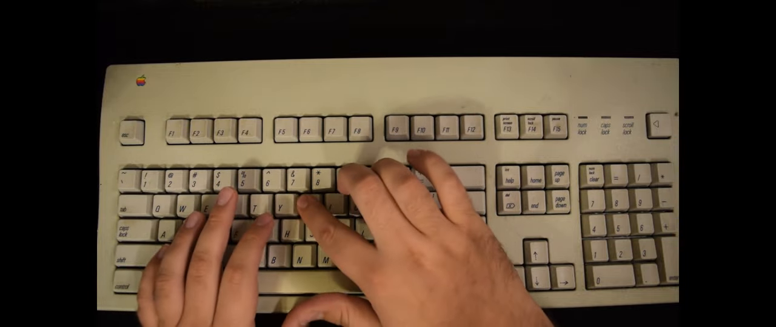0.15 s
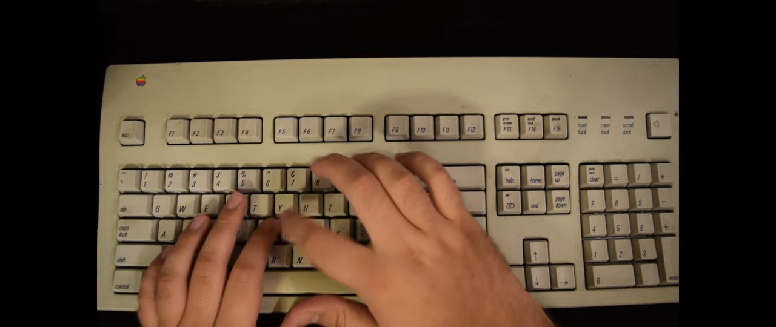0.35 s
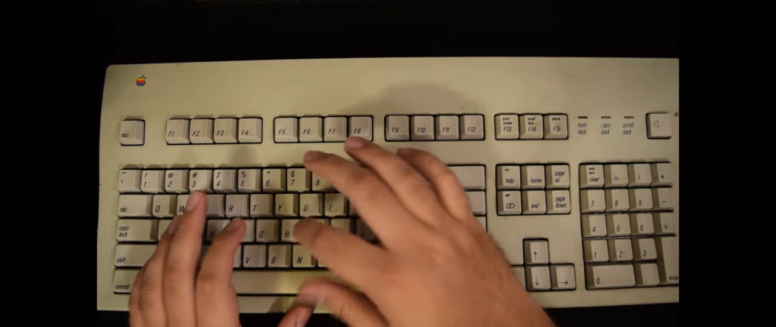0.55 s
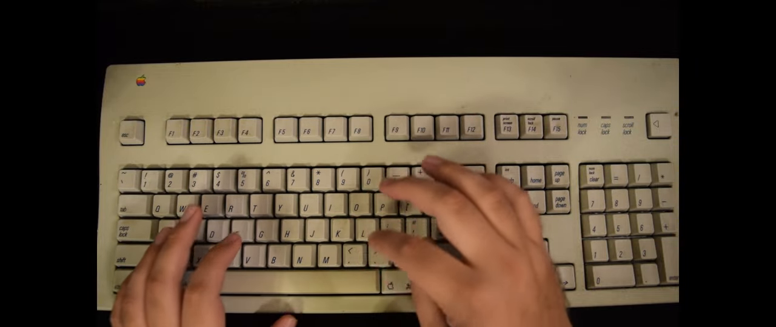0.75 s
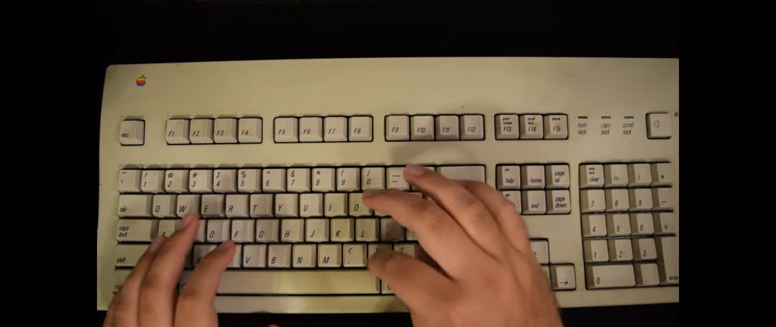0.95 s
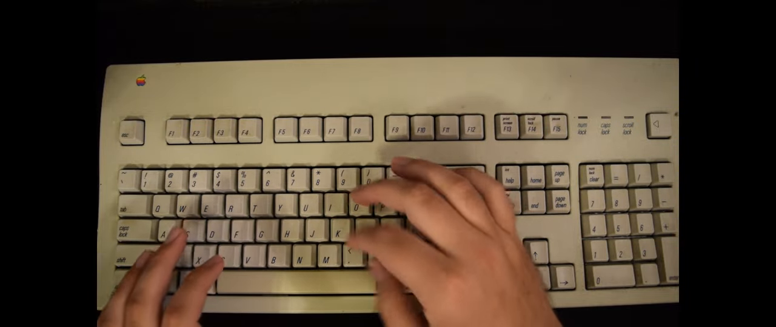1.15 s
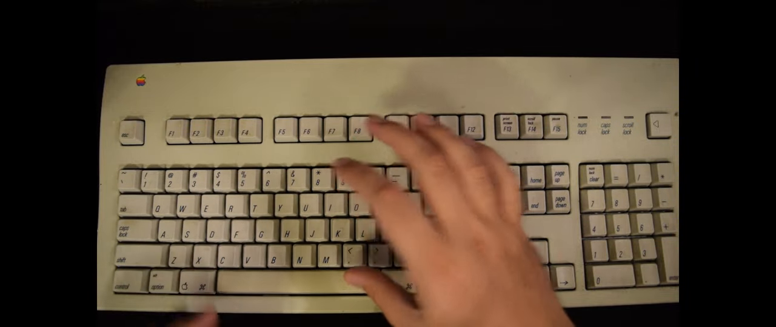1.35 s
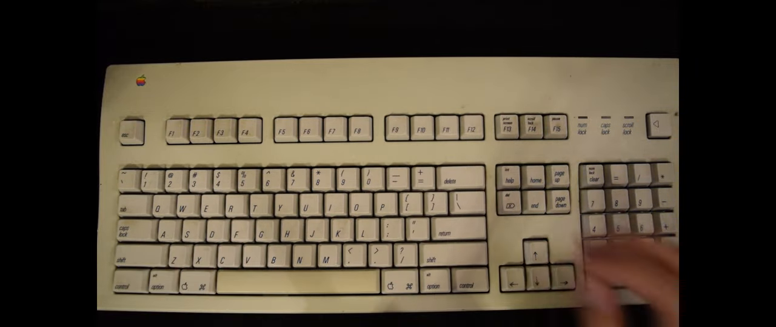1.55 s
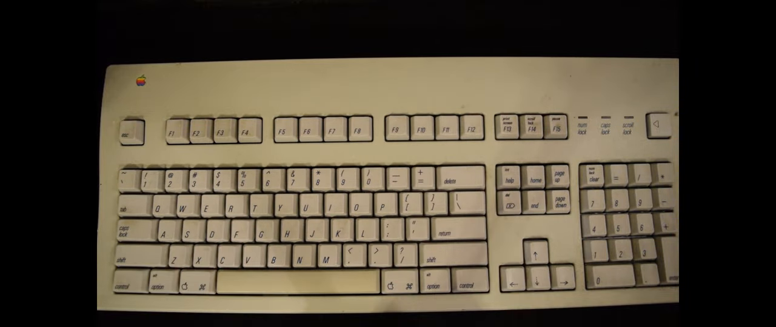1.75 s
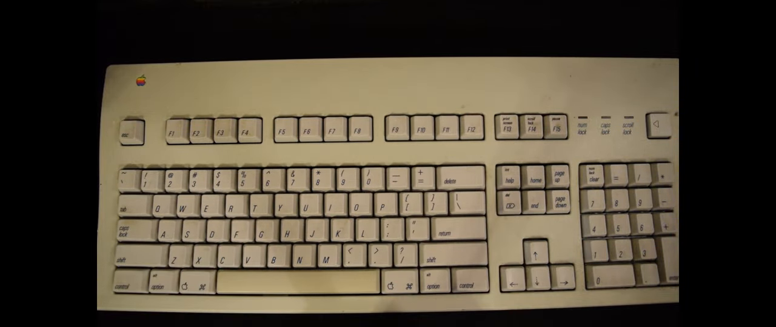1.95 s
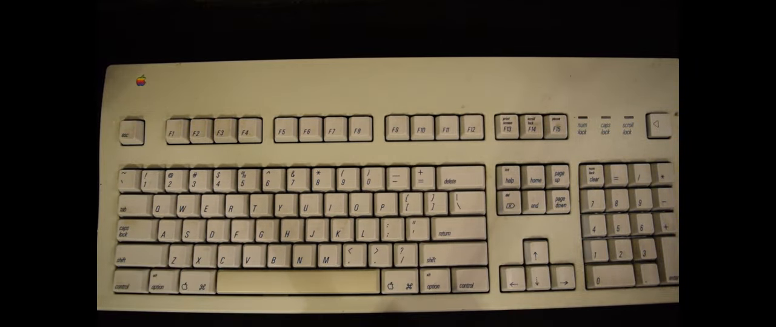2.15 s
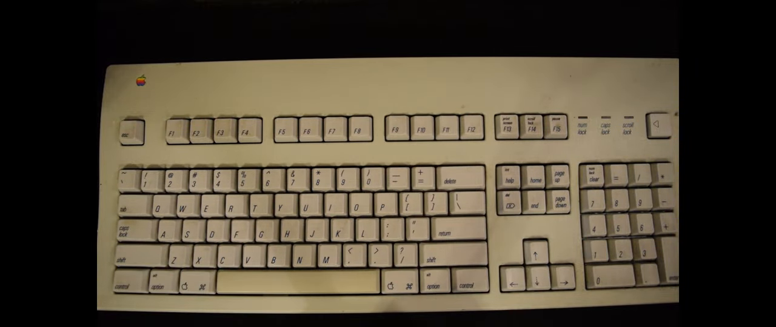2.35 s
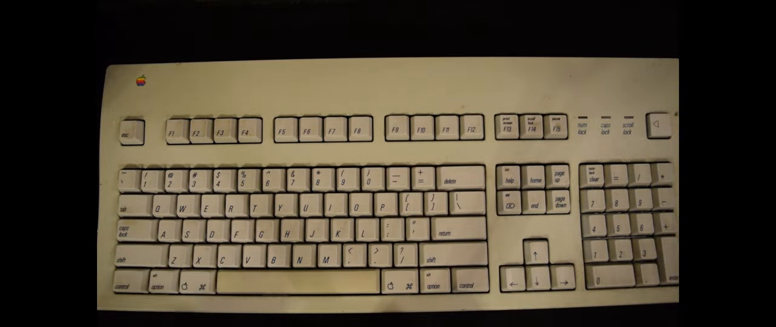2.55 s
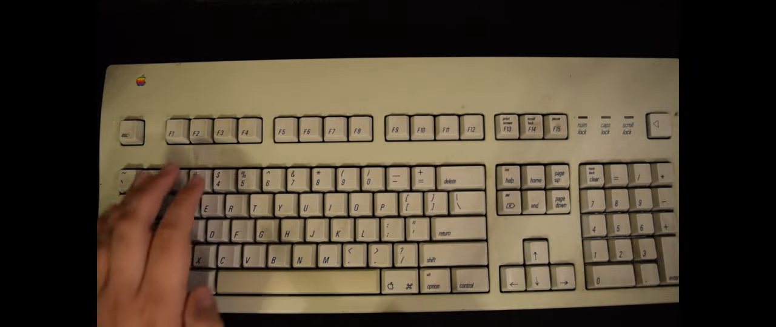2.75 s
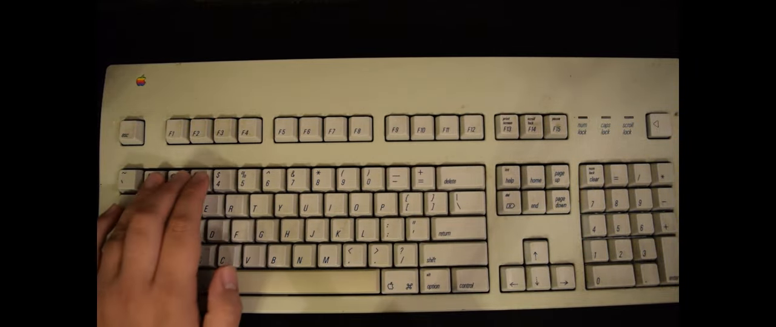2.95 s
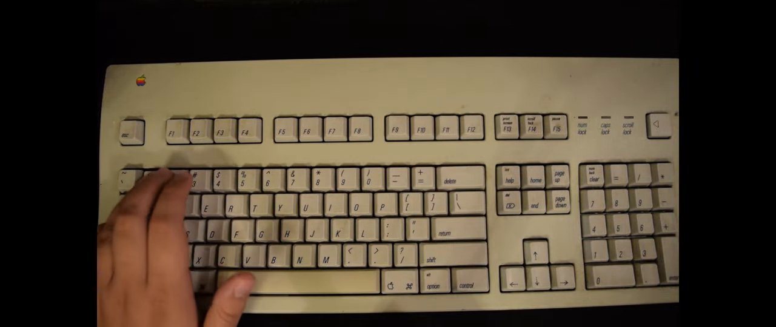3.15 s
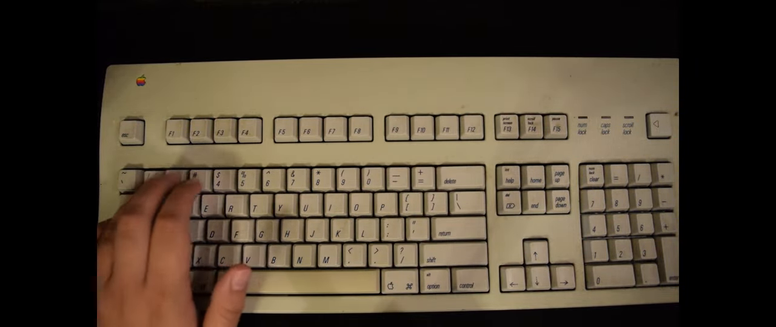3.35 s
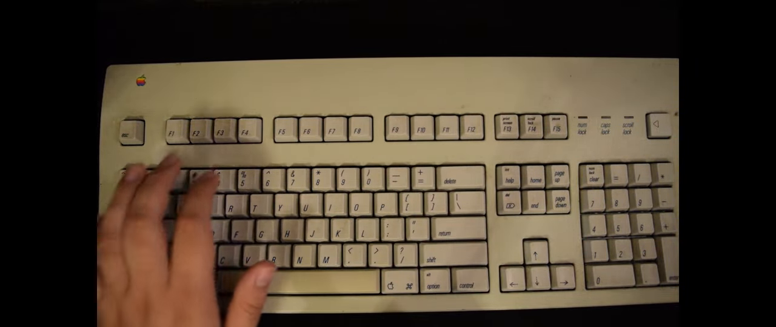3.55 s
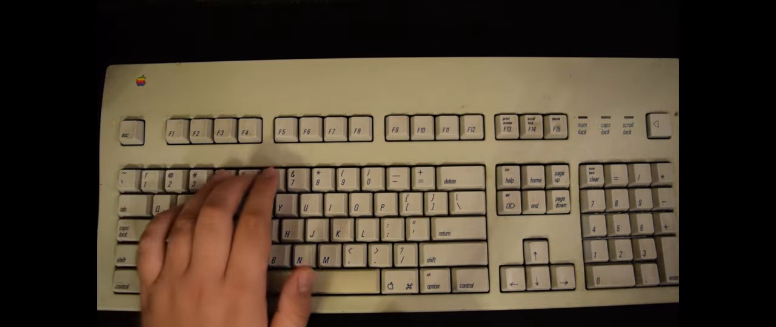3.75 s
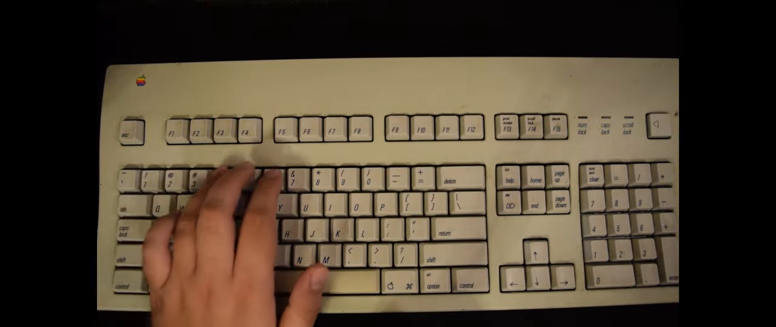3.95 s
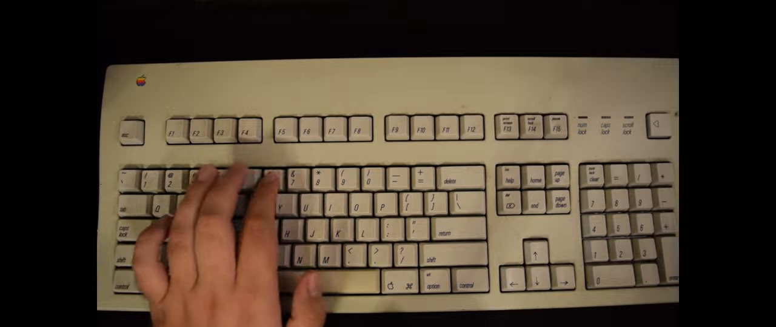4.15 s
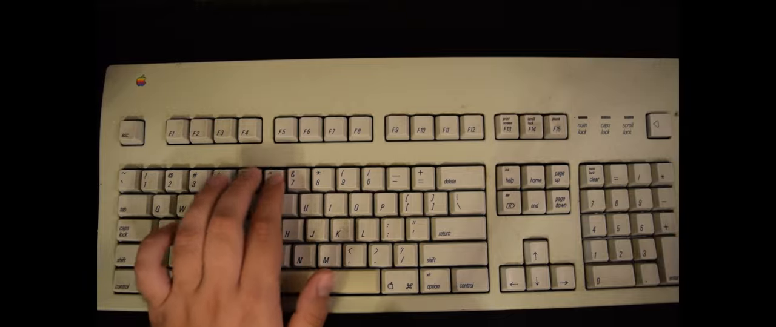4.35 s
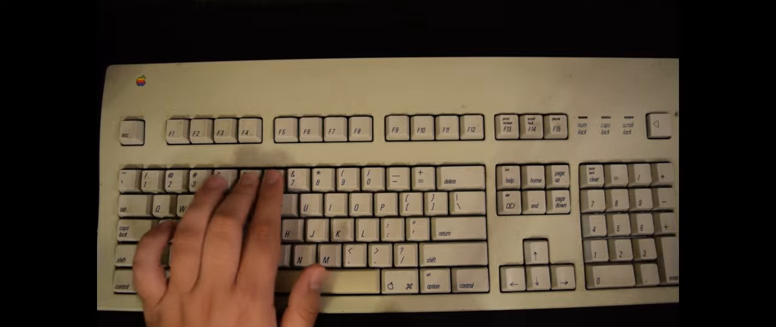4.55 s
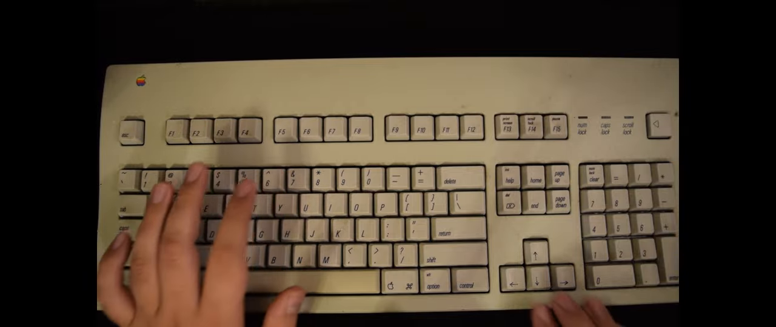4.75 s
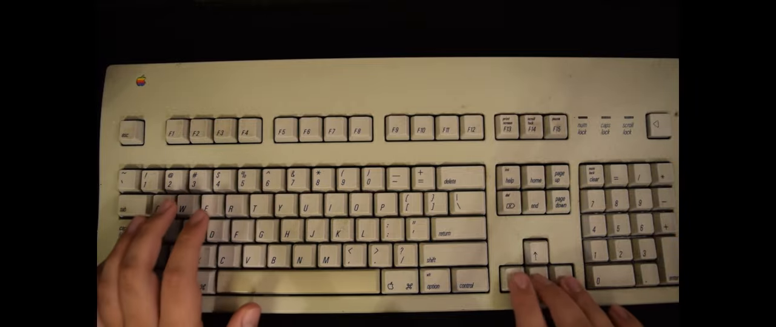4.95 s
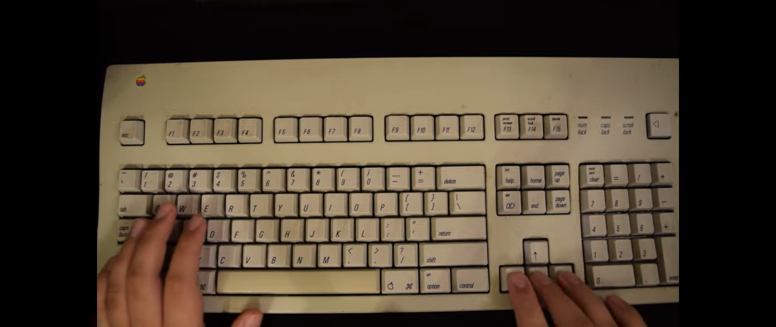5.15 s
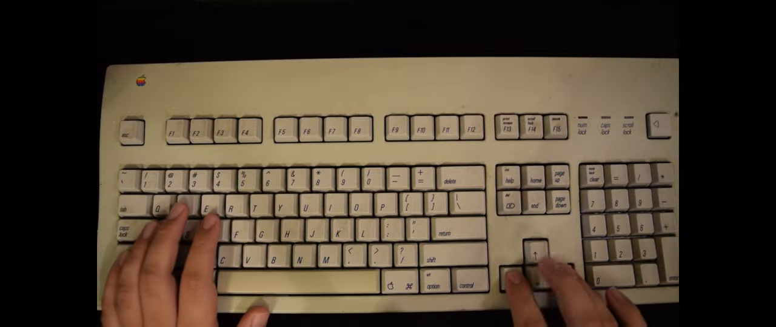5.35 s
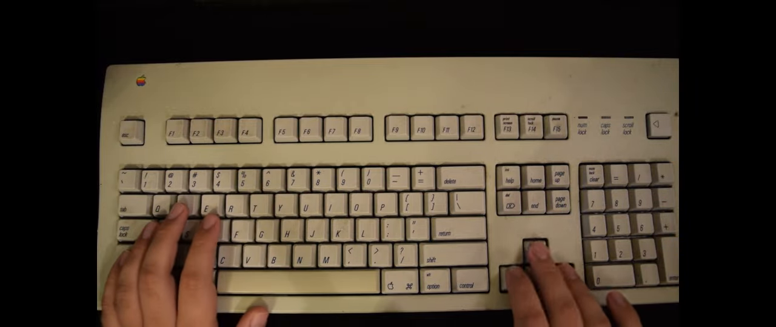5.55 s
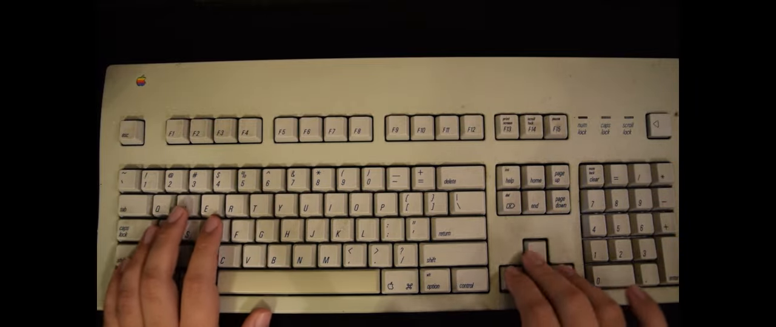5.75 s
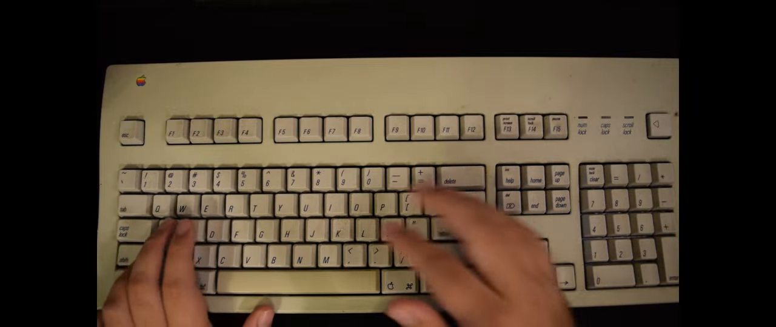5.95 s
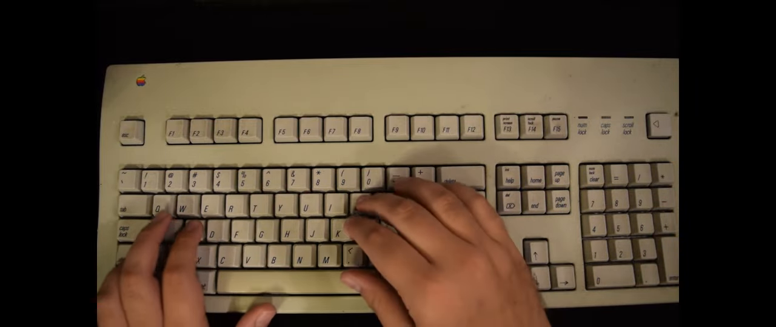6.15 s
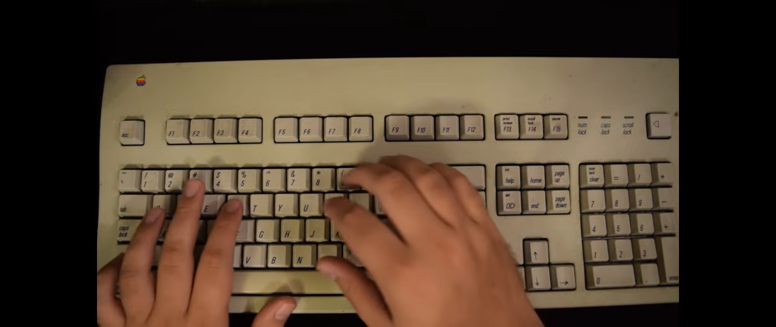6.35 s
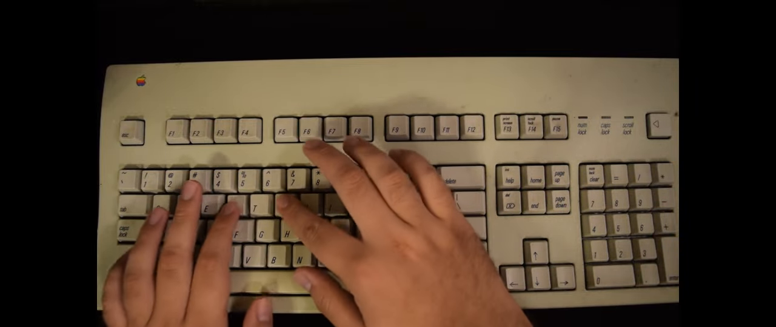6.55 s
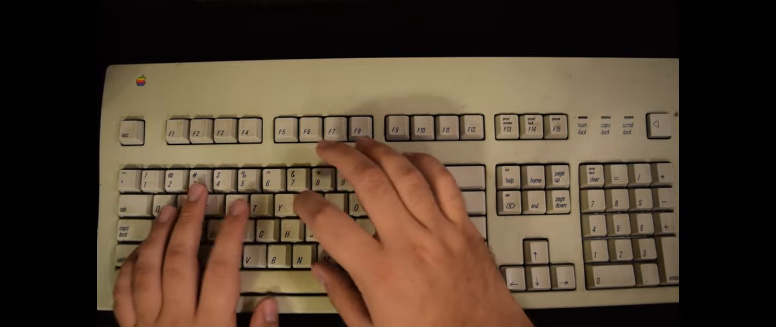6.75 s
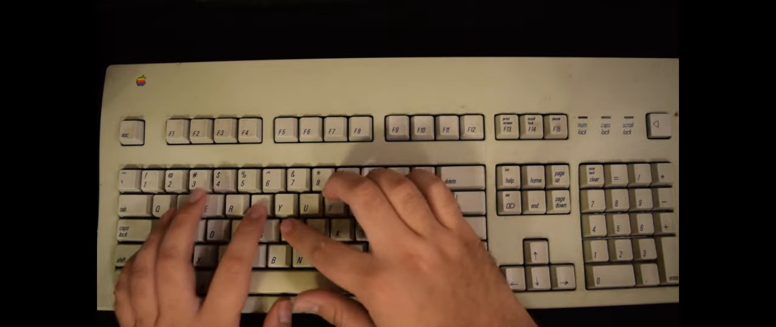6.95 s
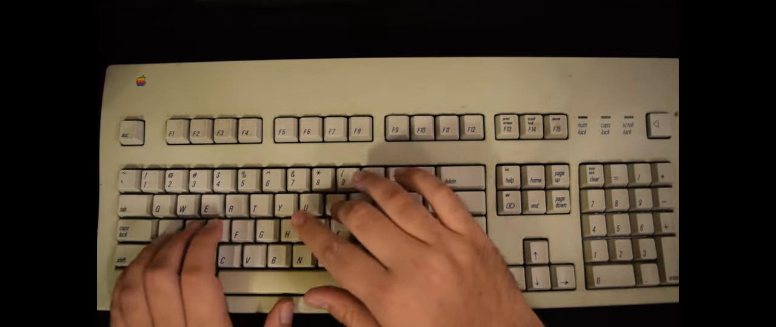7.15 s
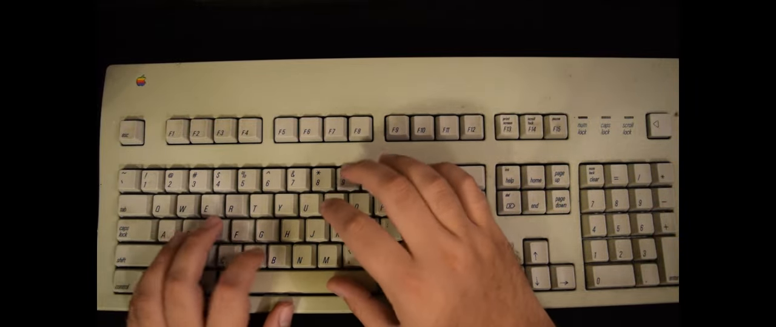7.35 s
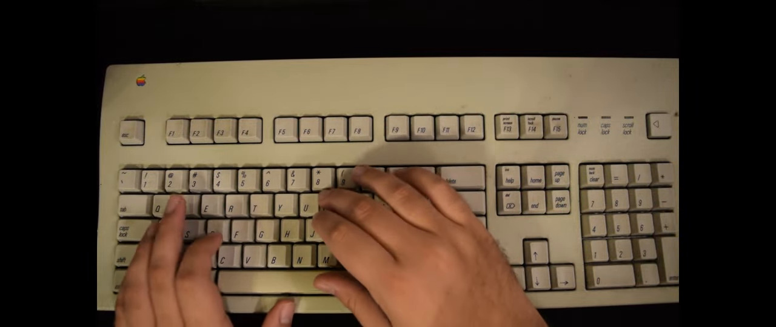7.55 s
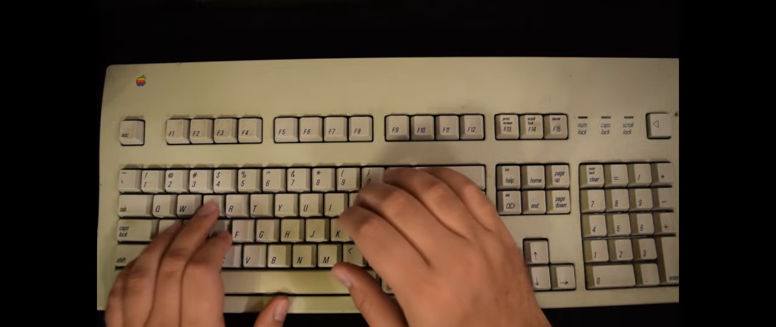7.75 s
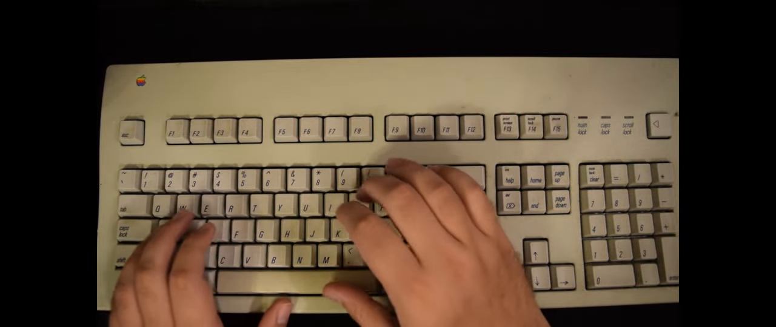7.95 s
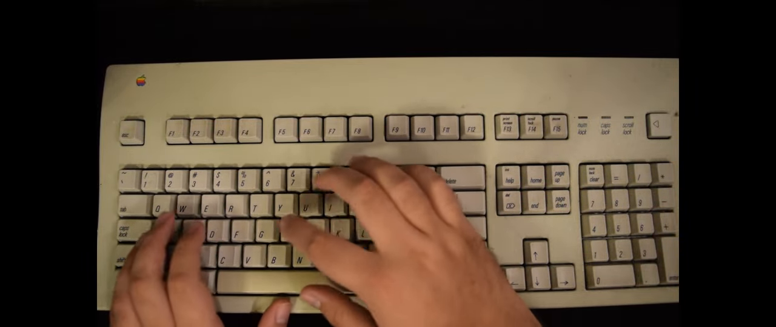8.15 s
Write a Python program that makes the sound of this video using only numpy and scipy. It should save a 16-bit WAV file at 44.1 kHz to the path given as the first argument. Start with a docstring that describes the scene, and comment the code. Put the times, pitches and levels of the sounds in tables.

```python
"""Fast typing on an old mechanical keyboard, close to one microphone in a quiet room.
Each key ticks, bottoms out and snaps back, sounding case, plate and cap; some springs ring on.
Loose caps chatter, fingers scuff, and the desk booms under the heavy strokes.
In a pause a sleeve rustles; behind it all lie a mains hum and the room's hush."""
import sys
import numpy as np
from scipy import signal
from scipy.fft import rfft, irfft, next_fast_len
from scipy.io import wavfile
from scipy.ndimage import uniform_filter1d, map_coordinates

SR = 44100
rng = np.random.default_rng(int(sys.argv[2]) if len(sys.argv) > 2 else 0)


def store_wav(level_fs):
    """Save 16-bit WAV to argv[1]."""
    pcm = np.round(np.clip(np.atleast_2d(level_fs), -1, 1) * 32767)
    wavfile.write(sys.argv[1], SR, pcm.T.astype(np.int16))


N = 362061

# key contacts at the microphone; hollowness lifts the case over the plate, brightness lifts the tick:
# (time [s], relative plate level [dB], hollowness [dB], brightness [dB], nominal length [ms])
KEY_CONTACTS = [(0.009, -46, -0.5, -11, 15), (0.0671, -35, 5, -4.5, 5), (0.1854, -41, -6, -11, 8),
                (0.21, -47.5, 2.5, -8.5, 15), (0.296, -57, -2, -41, 8.7), (0.373, -57.5, -8.5, -36, 5.7),
                (0.426, -53, -14, -29, 2.8), (0.4358, -52, -4, -29, 3.7), (0.468, -27, -7, -17, 7.9),
                (0.494, -36.5, 0.5, -14.5, 6.4), (0.5631, -31, -16, -5, 5), (0.5677, -22, -6.5, -11, 4.4),
                (0.6023, -39.5, -2, -6, 6.7), (0.6648, -31, -15.5, -18, 7.5), (0.8, -67.5, -8, -2, 5.2),
                (1.1272, -41, -8.5, -6.5, 5.7), (1.1404, -35, -3.5, -12, 5.6),
                (1.2502, -48.5, -13, -15.5, 15.4), (1.2589, -38.5, -1.5, -2.5, 5.4),
                (1.3754, -34, -14, 1.5, 6.3), (1.3831, -19.5, -6, -17.5, 6.9),
                (1.4916, -52.5, -9, 18.5, 6.4), (1.5053, -33.5, 1, 9.5, 6.9),
                (1.5198, -37.5, -2, 12.5, 19.8), (1.5276, -54.5, 8, 17, 8), (1.727, -63, 8, -18, 2),
                (2.9501, -45, -6, -11, 4.5), (2.981, -59, -2, -9, 4.5), (3.0304, -50, 6, -9, 4.5),
                (3.0414, -47, -6, -16, 4.6), (3.0828, -50.5, 10, -4, 5.1), (3.1371, -39, 9.5, -6, 4.2),
                (3.1644, -41, 0, -5, 9.4), (3.1978, -40.5, 5, 7.5, 4.6), (3.2623, -41.5, 5, 3, 8.2),
                (3.271, -34, -7.5, -6.5, 3.9), (3.2775, -30.5, 2.5, 2, 4.5), (3.3056, -54, 0, 0, 8.4),
                (3.3405, -36, 3, -14, 5.8), (3.3594, -42, 0, -2.5, 4), (3.3719, -27.5, -5, -7.5, 4.4),
                (3.3955, -43, 4.5, -5.5, 7.8), (3.4675, -57, 7, -4, 14.7), (3.4785, -41, 4.5, -5, 6.5),
                (3.4965, -40.5, 5.5, 4, 6.4), (3.5065, -30.5, 3.5, -2.5, 6.1), (3.5429, -59, -2, -14, 2.6),
                (3.577, -37, -2, 0, 5.7), (3.5832, -30, -0.5, -11, 4), (3.6152, -35.5, -2, -2, 9.5),
                (3.6411, -37.5, 4, 0, 5.3), (3.6813, -37, -0.5, -5.5, 6.1), (3.8646, -50, 0.5, -11, 18),
                (3.909, -40.5, 4, -12.5, 7.6), (3.9628, -39.5, -2, -22, 4.0), (3.981, -35, 1.5, -13, 3.5),
                (4.0577, -41, -1.5, -2, 13), (4.1072, -46, -5, 5, 4), (4.1156, -36.5, -2, -12, 4.2),
                (4.123, -32, -9, -10, 5.8), (4.1709, -36, 1.5, -8.5, 3.8), (4.206, -37.5, -5, -9, 5.1),
                (4.2184, -44, 7, -18, 4.7), (4.2475, -40.5, 2, 0, 7.4), (4.2812, -37, 0, 1.5, 6.1),
                (4.324, -35.5, -6.5, -8, 8.2), (4.349, -38.5, 4, 7.5, 2.5), (4.3535, -22, -12, 2, 3.4),
                (4.3653, -24.5, -6, -5.5, 4.5), (4.4095, -39, -5, -8, 5.5), (4.4192, -31, 1, -24.5, 4.3),
                (4.4574, -37, -0.5, -10, 8.2), (4.4933, -33.5, -6.5, -7, 8.2), (4.5318, -34.5, -4, -9, 6.8),
                (4.595, -27, -21, -9, 2.5), (4.5996, -21.5, -3.5, -4, 6.1), (4.6626, -36.5, 7.5, -14, 4.2),
                (4.6717, -40.5, 9, -2.5, 10.6), (4.7292, -34, -1.5, -7, 8.1),
                (4.7734, -36.5, 1.5, -12.5, 7.3), (4.988, -47.5, -1, -1.5, 10.4),
                (5.0179, -58, 3, -10, 14.5), (5.022, -40, 1, -16, 5.6), (5.081, -38, -2, -21, 6.7),
                (5.1224, -45, -1, 0.5, 10.4), (5.129, -42.5, 7, -15, 1.9), (5.1757, -55.5, 0, -2, 7),
                (5.1957, -41, -3, -6.5, 7.6), (5.2644, -46, -4, -2, 14), (5.2777, -46, 1, 0, 16.8),
                (5.2872, -33.5, -3, -11, 5.4), (5.3037, -56.5, 5, -7, 3.5), (5.3252, -53, 3, -4, 12),
                (5.3476, -42.5, 6, -11.5, 5.3), (5.3945, -50.5, 2.5, -2, 7.1),
                (5.4276, -49, -2.5, -4.5, 10), (5.4662, -52, 1.5, -17, 8.1), (5.5062, -42, 3.5, -5, 4.4),
                (5.576, -48, -5, -0.5, 14), (5.6067, -35.5, -1.5, -1, 4.9), (5.679, -54, -7, -5, 5.1),
                (5.692, -30.5, -5.5, -25, 6), (5.7696, -41.5, -1.5, -8, 13), (5.8145, -48.5, -1, -2.5, 20),
                (5.8434, -41.5, -1, -4, 6.7), (5.8655, -34.5, -3.5, 1, 4.5), (5.8972, -42.5, 0.5, -25, 7.2),
                (5.9227, -39.5, 0, -9, 8.8), (5.9494, -42, -6, -7, 10.5), (5.9854, -44, -1, -1.5, 9.5),
                (6.0498, -39, -12.5, -6.5, 4.7), (6.075, -57, 3, -4, 4.5), (6.1053, -21, -7, -5, 4.5),
                (6.1747, -50.5, -10, 13.5, 5.2), (6.187, -47.5, 8.5, -15, 5.3), (6.261, -49, -7, -8, 2.8),
                (6.2706, -53.5, -12, -9.5, 12), (6.3032, -31, -10.5, -25, 5.3),
                (6.3253, -43, -0.5, 3.5, 18.7), (6.3346, -39, -1.5, -4, 6.6),
                (6.442, -35.5, -7.5, -8.5, 7.3), (6.4839, -37.5, -2.5, 2, 4.8),
                (6.4897, -20.5, -5, -26.5, 2.5), (6.5452, -48, -3, -17, 2.9),
                (6.571, -33.5, -9.5, -7.5, 7.5), (6.6116, -48, -7, 3, 5), (6.628, -28.5, -9, -26, 4.1),
                (6.6698, -63.5, 5, 16, 4.5), (6.6918, -46, -6, -6, 4.0), (6.7121, -46, -12, -17, 3.3),
                (6.735, -32.5, -5, -13.5, 8), (6.8353, -34.5, -8, -8.5, 7.5), (6.8672, -34, -10, -5.5, 6),
                (6.9724, -52, -3, -14, 6.5), (6.9946, -50.5, -1.5, -5, 11), (7.017, -48, -11, 9, 5.3),
                (7.0298, -30, -5, 4.5, 7.1), (7.0436, -36, -5, 8, 7.8), (7.052, -28, -2, -8, 6.7),
                (7.1073, -41, -5, -6, 7.1), (7.1222, -43.5, 1, -13, 4.4), (7.1442, -34, -6.5, -22, 6.3),
                (7.1739, -51, -14, -33, 2.5), (7.2093, -45, -8, -20, 7.2), (7.2445, -28.5, -9.5, -17, 2.4),
                (7.2573, -37.5, 1, -21, 7.1), (7.3595, -57, 3, -31, 2.4), (7.391, -36, -2, -8, 10),
                (7.4126, -40.5, -11, 5, 6.3), (7.4537, -39.5, 2, -35, 8.2), (7.516, -32.5, -8, -3.5, 5.3),
                (7.5262, -34, -4, -14, 5.7), (7.6042, -50.5, -1, -21, 4), (7.6223, -38, -1.5, -6.5, 7.2),
                (7.677, -34.5, -13, -28, 3.8), (7.7007, -50, -8, 11, 12), (7.713, -33.5, 0, 6, 6.4),
                (7.7224, -31.5, -6.5, 3, 19.4), (7.7707, -38, -10, -15, 7.4),
                (7.785, -22.5, -6.5, -22, 2.5), (7.8072, -33, -15, -20, 6.9), (7.8263, -54, -2, -18, 5),
                (7.8472, -50, -3, -10, 5.2), (7.8635, -17.5, -5, -12, 2.4), (7.9307, -37, -11, -9.5, 5.5),
                (7.9544, -41, -5, -12, 12), (7.9618, -39.5, -4, -2, 18.3), (8.0654, -38, -4.5, -11, 6.2),
                (8.1252, -47.5, 2, 14, 3.7), (8.1322, -32.5, -13, -6, 7.6), (8.1528, -43.5, 6, -14, 5.8)]
# modes of case, plate, keycap and tick: (frequency [Hz], base width [Hz], relative level [dB])
CASE_MODES = [(500, 330, -12.5), (802.5, 237, -3), (920, 212, -1), (1159, 248, -1.5), (1301, 216, -3.5)]
PLATE_MODES = [(1685, 220, -2.5), (1778, 155, 1.5), (2003, 200, 4), (2800, 1130, -8), (3080, 190, -2)]
CAP_MODES = [(4070, 500, -5), (5300, 1730, -2), (6070, 400, -0.5)]
TICK_MODES = [(7460, 1050, -5), (7860, 2800, -3), (8940, 1500, -3), (10620, 360, -7), (11830, 830, -8.5),
              (14500, 1700, -20.5), (14030, 920, -21.5)]
# springs that ring out: (time [s], pitch [Hz], relative level [dB])
SPRING_PLUCKS = [(.57, 914, -80), (0.666, 906, -69.5), (1.14, 920, -78), (1.506, 922, -71),
                 (3.28, 916, -71), (3.683, 907, -67.5), (4.35, 912, -59), (4.729, 950, -79),
                 (4.776, 920, -68.5), (6.105, 898, -69), (6.491, 953, -64.5), (7.258, 906, -71),
                 (7.864, 915, -60.5)]
# harmonics 1 to 4 of a spring: (relative level [dB], t60 [s])
SPRING_HARMONICS = [(8.5, 0.93), (-5, 1), (-5.5, 0.74), (-19, 0.35)]
# heavy strokes that reach the desk: (time [s], boom level [dB])
DESK_THUMPS = [(0.567, -48), (1.145, -52), (1.385, -38), (1.505, -36.5), (3.5, -47.5), (3.602, -47.5),
               (4.432, -47.5), (5.287, -49.5), (5.716, -53), (5.843, -50), (6.101, -49), (7.028, -35),
               (7.256, -46.5), (7.419, -47), (7.715, -36), (7.865, -50)]
# the desk's low boom and hollow knock: (frequency [Hz], relative level [dB], t60 [s])
BOOM_MODES = [(129, 1, 0.18), (151.5, -7.5, 0.2), (186.3, 0.5, 0.12), (214, -12.5, 0.24)]
KNOCK_MODES = [(379, 3.5, 0.15)]
# sleeve movements in the pause: (time [s], length [s], level [dB])
SLEEVE_MOVES = [(1.532, 0.19, -69), (1.926, 0.19, -64.5), (2.286, 0.096, -77), (2.515, .11, -75)]
# noise of the desk, of rubbing cloth and of the room: (frequency [Hz], relative density [dB])
SHUDDER_SPECTRUM = [(12, -35), (22, 7), (28, 14), (38, 2.5), (52, 2.5), (75, -9.5), (130, -6.5), (260, -53)]
RUSTLE_SPECTRUM = [(240, -36), (400, -3), (844, -1), (913, 1), (1270, 3.5), (1700, -4.5), (4610, -7),
                   (15000, -20), (16500, -38)]
HUSH_SPECTRUM = [(12, -7.5), (25, -2.5), (60, -12.5), (120, -16.5), (190, -15), (280, -25), (370, -25.5),
                 (500, -34), (1000, -33.5), (1600, -41), (4000, -49.5), (10000, -57), (12500, -59.5),
                 (16500, -100)]
# the room's decay: (frequency [Hz], t60 [s])
ROOM_DECAY = [(200, .35), (1000, 0.21), (3000, 0.12), (8000, .14), (15000, 0.13)]
# mains hum and a faint whine: (frequency [Hz], rms level [dB])
HUM_TONES = [(59.2, -63), (118.4, -77.5), (177.6, -82), (2750, -97)]

SPAN = 4096  # samples for one contact to ring out


def contacts():
    """Time, levels of the four parts and length of each contact; the cap follows its tone colour."""
    time, plate_db, hollow_db, bright_db, length_ms = np.transpose(KEY_CONTACTS)
    cap_db = plate_db + 0.55 * bright_db + 0.1 * hollow_db
    return np.array([time, plate_db + hollow_db, plate_db, cap_db, plate_db + bright_db, length_ms])


def keys():
    """Keys, close up: a hard, short contact is a clean blow; a soft one scrapes in and dies away."""
    time, case_db, plate_db, cap_db, tick_db, length_ms = contacts()[:, :, None]
    lead_s = 0.02  # friction starts ahead of the blow
    t = np.arange(SPAN // 2) / SR - lead_s
    fade_in = np.clip((t + lead_s) / 0.01, 0, 1)
    scrape_s = np.clip(length_ms - 2.6, 0.2, 12) / 1000  # what lasts beyond the ring of the parts
    clean = 1 / (1.5 + np.exp(length_ms / 1.21 - 4.5 - (plate_db + 34.5) / 4))
    damping = 1 + 0.62 * clean  # a clean blow holds the parts and widens their modes
    case_shift = 0.007 * (case_db - plate_db)  # hollow contacts ring higher

    def force(rise, fall, blow_db):
        """Gritty friction that swells and fades around one short blow."""
        swell = fade_in * np.exp(np.minimum(t, 0) / (rise * scrape_s * (1 - clean)))
        envelope = np.where(t < 0, swell, np.exp(-t / (fall * scrape_s + 0.0011)))
        grit = amp(4.5 * uniform_filter1d(rng.standard_normal(envelope.shape), 30, axis=1) * np.sqrt(30))
        friction = rng.standard_normal(envelope.shape) * envelope * grit
        blow = np.exp(-(t / 0.00004) ** 2)
        return friction * (1 - 0.4 * clean) + amp(blow_db) * clean * blow

    case = key_part(force(0.33, 1.0, 18), CASE_MODES, damping, scatter_db=2.5, detune=0.059,
                    shift=case_shift)
    plate = key_part(force(0.65, 0.8, 21), PLATE_MODES, damping, scatter_db=3, detune=0.059)
    cap = key_part(force(0.62, 0.41, 12), CAP_MODES, damping, scatter_db=3, detune=0.011)
    tick = key_part(force(0.22, 0.71, 25), TICK_MODES, damping, scatter_db=2.5, detune=0.037)
    strokes = (amp(case_db + 3) * case + amp(plate_db + 1.5) * plate
               + amp(cap_db + 3.5) * cap + amp(tick_db + 2) * tick)
    return placed(strokes, time[:, 0] - 0.0006, early=lead_s)


def key_part(force, modes, damping, scatter_db, detune, shift=0):
    """Each row of force rings a part's modes, which differ a little from key to key; rows peak at 1."""
    f = np.fft.rfftfreq(SPAN, 1 / SR)
    scatter = rng.standard_normal((len(force), 2 * len(modes)))
    response = 0
    for k, (hz, width, db) in enumerate(modes):
        centre = hz * (1 + shift + detune * scatter[:, [2 * k]])
        level = amp(db + scatter_db * scatter[:, [2 * k + 1]])
        response = response + (-1) ** k * level * mode_response(f, centre, width * damping)
    push = rfft(force, SPAN)
    # a brief force drives all pitches evenly
    push /= np.sqrt(uniform_filter1d(np.abs(push) ** 2, size=60, axis=1))
    ring = irfft(push * response, SPAN)
    return ring / np.abs(ring).max(axis=1, keepdims=True)


def mode_response(f, centre, width):
    """Band-pass response of one mode, all in Hz."""
    return 1j * f * width / (centre ** 2 - f * f + 1j * f * width)


def stirred(t60):
    """Envelope of how much the keyboard still shakes from the last blows on its case."""
    t = np.arange(SR // 4) / SR
    times, case_db = contacts()[:2]
    energy = amp(0.49 * case_db[:, None] - 60 * t / t60) ** 2 * (1 - np.exp(-t / 0.002))
    return np.sqrt(placed(energy, times))


def cap_rattle(taps_per_s=120, spread_db=7):
    """Neighbouring caps chatter on their stems after the blows: small random taps on plate and cap."""
    hits = rng.random(N) < taps_per_s / SR
    taps = hits * amp(spread_db * rng.standard_normal(N)) * stirred(t60=0.19)
    response = lambda f: sum((-1) ** k * amp(db) * mode_response(f, hz, width)
                             for k, (hz, width, db) in enumerate(PLATE_MODES + CAP_MODES))
    return amp(-22.5) * filtered(taps, response)


def springs():
    """A plucked coil spring rings faintly on whole multiples of its pitch."""
    time, hz, level_db = np.transpose(SPRING_PLUCKS)[:, :, None]
    t = np.arange(SR // 2) / SR
    ring = sum(amp(db - 60 * t / t60) * np.sin(2 * np.pi * k * hz * t)
               for k, (db, t60) in enumerate(SPRING_HARMONICS, start=1))
    return placed(amp(level_db) * ring * (1 - np.exp(-t / 0.0041)), time[:, 0])


def desk():
    """Heavy strokes boom and knock in the desk; every blow makes it shudder under the microphone."""
    t = np.arange(SR // 4) / SR
    times, levels = np.transpose(DESK_THUMPS)
    thumps = []
    for boom_db in levels:
        knock_db = -52 + 1.2 * (boom_db + 41.5)  # the knock grows faster than the boom
        boom = amp(boom_db) * struck(BOOM_MODES, t, rise=0.0059)
        thumps.append(boom + amp(knock_db) * struck(KNOCK_MODES, t, rise=0.0012))
    shudder = amp(-28) * stirred(t60=0.31) * noise(SHUDDER_SPECTRUM)
    return placed(thumps, times) + shudder


def struck(modes, t, rise):
    """Modes ringing after a soft blow."""
    ring = sum(amp(db + rng.normal(0, 0.67) - 60 * t / t60) * np.sin(2 * np.pi * hz * t)
               for hz, db, t60 in modes)
    return ring * (1 - np.exp(-t / rise))


def finger_scuffs():
    """Fingers scuff over loose caps between strokes: spiky friction noise."""
    friction = unit(noise(RUSTLE_SPECTRUM) * amp(2.3 * wobble(160)))
    return amp(-46) * stirred(t60=0.37) * friction


def sleeve(rise_s=0.026, fall_s=0.061):
    """Cloth slides on cloth: a soft, grainy hiss that swells, holds and fades with each movement."""
    t = np.arange(N) / SR
    swell = sum(amp(db) * np.exp(np.minimum(t - at, 0) / rise_s - np.maximum(t - at - hold, 0) / fall_s)
                for at, hold, db in SLEEVE_MOVES)
    return swell * unit(noise(RUSTLE_SPECTRUM) * amp(1.3 * wobble(70)))


def room_reflections(x):
    """The room answers with a short, dull tail, drawn afresh for each quarter second of sound."""
    out = np.zeros(N + SR)
    step, delay_samples = SR // 4, 120
    for start in range(0, N, step):
        hz, t, bands = signal.stft(rng.standard_normal(SR // 3), SR, nperseg=256)
        decay = amp(-60 * t / along(ROOM_DECAY, hz)[:, None])
        tail = signal.istft(bands * decay, SR, nperseg=256)[1]
        wet = signal.fftconvolve(x[start:start + step], tail / np.linalg.norm(tail))
        out[start + delay_samples:][:len(wet)] += wet
    return filtered(out[:N], lambda hz: 1 / (1 + 1j * hz / 5000))  # soft furnishings swallow the treble


def room_tone():
    """Behind the keyboard: the room's hush, a wavering mains hum and a faint whine."""
    t = np.arange(N) / SR
    hum = sum(np.sqrt(2) * amp(db + 2.5 * wobble(9)) * np.sin(2 * np.pi * hz * t + 0.9 * wobble(9))
              for hz, db in HUM_TONES)
    return amp(-60.5) * noise(HUSH_SPECTRUM) + hum


def amp(db):
    """Gain of a level in dB."""
    return 10 ** (np.asarray(db) / 20)


def unit(x):
    """x at rms 1."""
    return x / np.sqrt(np.mean(x ** 2) + 1e-20)


def along(points, hz):
    """(Hz, value) points on a log axis."""
    f, v = np.transpose(points)
    return np.interp(np.log(hz + 1), np.log(f + 1), v)


def wobble(rate):
    """A smooth random curve, rate knots a second."""
    return map_coordinates(rng.standard_normal(int(N * rate / SR) + 4), [np.arange(N) * rate / SR])


def filtered(x, response):
    """x times a response of frequency."""
    m = next_fast_len(N + SR // 2)
    return irfft(rfft(x, m) * response(np.fft.rfftfreq(m, 1 / SR)), m)[..., :N]


def noise(spectrum):
    """Coloured noise of rms 1."""
    return unit(filtered(rng.standard_normal(N), lambda hz: amp(along(spectrum, hz))))


def placed(rows, times, early=0):
    """Rows of sound laid out at their times; each row may begin early seconds before its time."""
    out = np.zeros(N + SR)
    for s, row in zip(times, rows):
        out[round(s * SR):][:len(row)] += row
    return out[round(early * SR):][:N]


def scene():
    """At the one close microphone: keyboard, desk and hands in front, the room well behind."""
    typing = keys() + cap_rattle()
    reflections = amp(-11) * room_reflections(typing)
    return (typing + reflections + springs() + desk() + finger_scuffs() + sleeve() + room_tone())[None]


def record(dry):
    """The recorder keeps nothing above 16.1 kHz."""
    return filtered(dry, lambda hz: hz < 16100)


dry = scene()
out = record(dry)
store_wav(out)
```